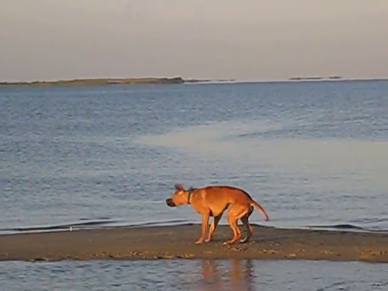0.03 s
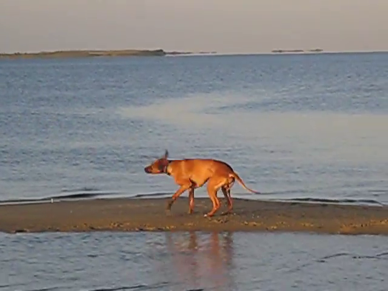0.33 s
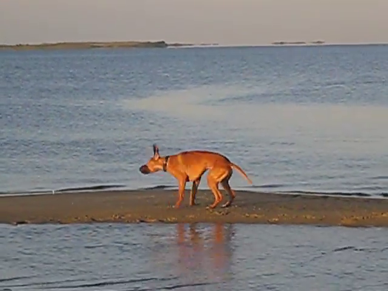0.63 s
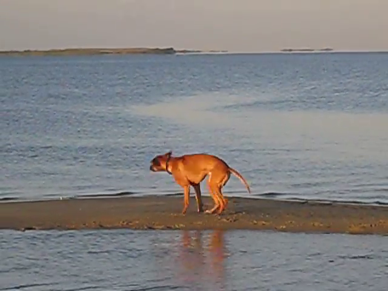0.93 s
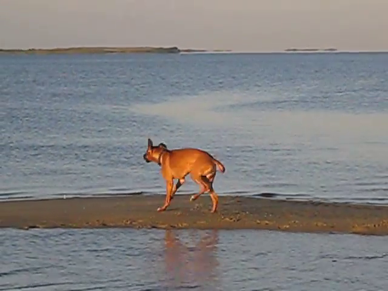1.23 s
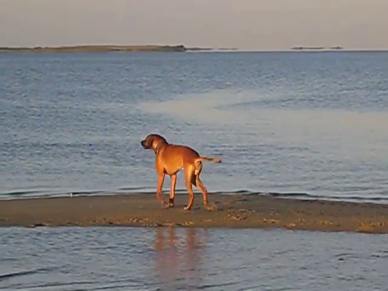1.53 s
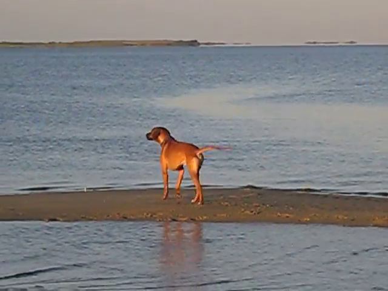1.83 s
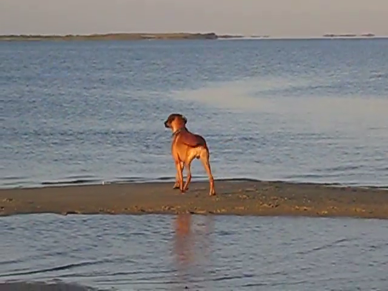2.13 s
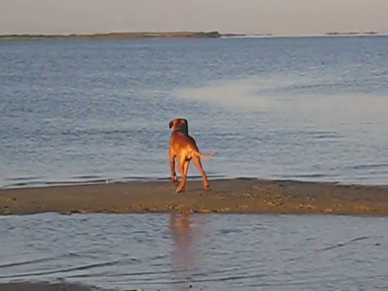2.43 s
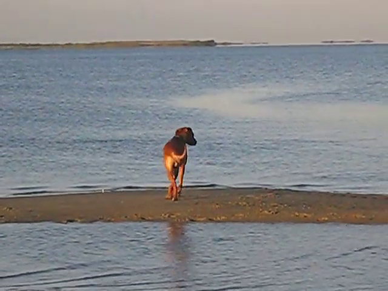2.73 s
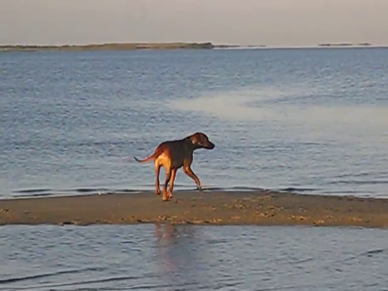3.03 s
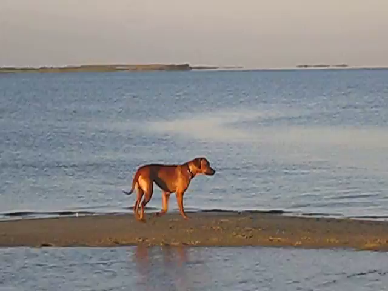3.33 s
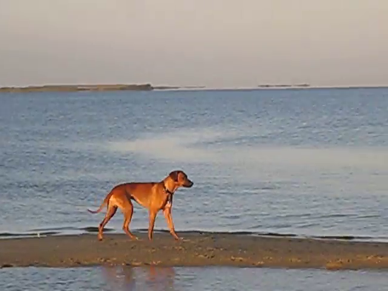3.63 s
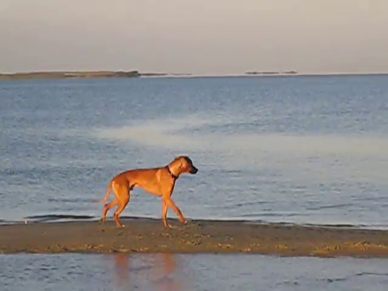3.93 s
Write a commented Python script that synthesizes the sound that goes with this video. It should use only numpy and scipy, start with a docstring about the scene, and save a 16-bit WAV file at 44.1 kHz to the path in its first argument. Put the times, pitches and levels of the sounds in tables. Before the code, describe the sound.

Outdoors by the water, a dog gives a quick shake with flapping ears and rattling collar tags. The jingling dies away, leaving soft steps in wet sand, fizzing ripples, light wind and a low distant hum.

```python
"""You hear a wet dog shake itself on a sandbar: ears slap, the collar clacks and metal tags jingle.
Then it walks on over wet sand, with an odd faint clink. Wind, lapping ripples and a low distant hum
fill the bay. Knocks, tags and bubbles ring with fading tones; the ears are short soft bursts;
spray, sand and fizz are crowds of tiny clicks; the wind is noise that slowly swells."""
import sys
import numpy as np
from scipy import signal
from scipy.fft import rfft, irfft
from scipy.io import wavfile

SR = 44100
rng = np.random.default_rng(int(sys.argv[2]) if len(sys.argv) > 2 else 0)


def to_wav(s):
    """Save 16-bit WAV."""
    ch = np.atleast_2d(s).T  # columns
    pcm = np.round(np.clip(ch, -1, 1) * 32767)  # PCM
    wavfile.write(sys.argv[1], SR, pcm.astype(np.int16))


N = 176400
T = np.arange(N) / SR
AGE = T[:SR // 5]  # seconds since a short sound began

# The low, middle and top tones of the metal tags.
# Each row: pitch in Hz, level in dB, seconds to fade by 60 dB.
TAG_LOW_TONES = [(5810, -20, 0.02), (6820, -3.5, 0.286), (7440, -3, 0.039), (7865, 3.5, 0.035)]
TAG_MID_TONES = [(8620, -14.5, 0.076), (10550, 13, 0.03), (10340, -3.5, 0.0163)]
TAG_TOP_TONES = [(11960, -5, 0.139), (12103, 0.5, 0.0226), (12400, -25, .04), (14300, -12.5, 0.065)]


def collar():
    """Buckle and tags knock together: a hollow body tone, a short clack and a bright tick."""
    # Each row: start in seconds, then the relative levels of body, clack and tick in dB.
    knocks = [(0.0166, -67.5, -54.5, -20), (0.0325, -55, -57, -24), (0.042, -59, -38, -30),
              (0.11, -41.5, -30, -26), (0.115, -36, -35, -32.5), (0.1453, -41, -42, -29.5),
              (0.174, -50.5, -38, -43), (0.205, -51.5, -43.5, -26.5), (0.211, -54.5, -46.5, -28.5),
              (0.307, -34.5, -37.5, -25.5), (0.311, -29, -28.5, -31), (0.324, -39.5, -34, -29.5),
              (0.328, -29.5, -39, -46.5), (0.3457, -34.5, -33, -34), (0.397, -62, -65, -36),
              (0.5417, -29.5, -47.5, -27.5), (0.545, -43, -51, -31), (0.611, -66, -61.5, -37.5),
              (0.6379, -54, -51, -27.5), (0.657, -60.5, -49.5, -31.5), (0.688, -66, -43.5, -20.5),
              (0.7029, -30, -19, -15), (0.709, -24.5, -24.5, -24.5), (0.7128, -27, -28.5, -39),
              (0.715, -21.5, -29, -16), (0.719, -36, -38, -48), (0.7306, -30, -41, -27),
              (0.7434, -33, -36, -28), (0.822, -58, -37.5, -26), (0.833, -51, -47.5, -28),
              (0.839, -54, -51, -39.5), (0.84, -52, -35.5, -23), (0.889, -57.5, -57, -30),
              (0.899, -23.5, -14, -19), (0.906, -36, -24.5, -25.5), (0.91, -27, -28, -25),
              (0.912, -28.5, -33, -23.5), (1.037, -47.5, -46.5, -37), (1.121, -60, -60, -30),
              (1.1283, -28, -30, -28.5), (1.134, -45, -40, -31), (1.146, -34.5, -51.5, -29),
              (1.314, -66.5, -44, -61), (1.725, -47, -64, -61.5)]
    # What a knock rings with. Each row: pitch in Hz, level in dB, seconds to fade by 60 dB.
    body_tones = [(1800, 1, 0.00765), (2002.6, 1, 0.0245), (2164.7, -7, 0.057), (2279, 10.5, 0.0136),
                  (2586.4, 2, 0.0341), (2943, 10, 0.009)]
    clack_tones = [(3412, -1, 0.0093), (3496, -9.5, 0.01045), (3980, -3.5, 0.0087), (4178, 13.5, 0.00719),
                   (4650, 1, 0.0078), (4800, -8, 0.0157), (6084, -4, 0.021), (6120, -26, 0.076)]
    # The tick's tone colour. Each row: frequency in Hz, level in dB.
    tick_colour = [(1500, -47.5), (4500, 3), (6300, 2.5), (9000, 3), (11000, 1.5), (13200, -5.5),
                   (14600, -2.5), (16000, -5)]
    onset = 1 - np.exp(-(AGE / 0.000428) ** 2)
    tick_fade = fade(0.0033) + amp(-4) * fade(0.0245)  # a snap and a softer tail
    out = np.zeros(N)
    for start, body_db, clack_db, tick_db in knocks:
        body = onset * ring(body_tones, vary_db=2.06, detune=0.0448)
        clack = onset * ring(clack_tones, vary_db=29.5, detune=0.0277)
        tick = colour(rng.standard_normal(len(AGE)) * tick_fade * onset, tick_colour)
        for part, db in (body, body_db), (clack, clack_db), (tick, tick_db - 5.5):
            add(out, start, amp(db) * unit(part, size=150))
    return out


def tags():
    """Thin metal tags chatter as they touch, ring freely for a moment, then settle against the fur."""
    # Each row: start in seconds, levels of the low, middle and top tones in dB, seconds of free ringing.
    jingles = [(.005,-32.5,-38.5,-34.5,0.014), (0.016,-29.5,-43,-41,0.0026), (.026,-40.5,-40,-24.5,0.0147),
               (0.116,-35.5,-46,-39.5,0.0057), (.176,-56,-57.5,-41,0.0064), (.207,-58,-52,-42.5,0.011),
               (.246,-57,-56.5,-47.5,0.022), (0.312,-44,-46.5,-37.5,.02), (0.336,-46.5,-57.5,-30,0.0086),
               (0.491,-43.5,-53,-32.5,0.0227), (0.613,-59.5,-41,-40.5,.008), (.637,-28,-43.5,-32,0.0053),
               (.651,-31.5,-48,-35.5,0.0055), (0.688,-45.5,-35,-28.5,0.00276),
               (0.706,-46.5,-25,-40.5,0.0062), (0.721,-40,-60,-57.5,0.017), (.79,-61,-62.5,-43,0.0146),
               (.823,-35,-53,-36,0.0074), (0.834,-38.5,-52,-26,0.0064), (.912,-48,-42,-27.5,0.0143),
               (0.984,-47.5,-43,-56,.021), (1.005,-50.5,-58.5,-35,0.002), (1.09,-57.5,-62,-46.5,0.0206),
               (1.106,-57,-59,-37.5,0.013), (1.129,-36.5,-54,-39,0.0233), (1.183,-60,-65.5,-33,0.0164),
               (1.341,-53.5,-57.5,-47.5,0.025), (1.9,-69.5,-68.5,-59.5,.02),
               (3.594,-66.5,-75.5,-59.5,0.024), (3.906,-70.5,-61,-62,0.0118)]
    fur_damping_db = -16
    onset = 1 - np.exp(-AGE / 0.00104)
    out = np.zeros(N)
    for start, *levels, free_s in jingles:
        damping = amp(fur_damping_db * np.clip((AGE - free_s) / 0.0085, 0, 1))
        touches = 0.304 * clicks(790, 1.73)[:len(AGE)] * np.exp(-AGE / 0.007)
        touches[0] += 1  # the main hit
        for tones, db in zip((TAG_LOW_TONES, TAG_MID_TONES, TAG_TOP_TONES), levels):
            one_ring = onset * ring(tones, vary_db=5.3, detune=0.01646)
            jingle = signal.fftconvolve(touches, one_ring)[:len(AGE)]
            jingle *= 1 + 0.372 * drift(1060)[:len(AGE)]  # scraping edges roughen the ring
            add(out, start, amp(db) * unit(damping * jingle, size=370))
    return out


def ears():
    """Each ear brushes in with a spatter of wet hair and lands on the head with a soft clap."""
    # Each row: start in seconds, slap level in dB, relative spatter level in dB, pitch in Hz.
    flaps = [(0.081,-36.5,-42.5,846), (.184,-41.5,-62.5,938), (.2799,-34,-38,736), (0.38,-42,-48.5,720.8),
             (0.4706,-47,-34,1287), (.542,-41,-33.5,1360), (0.5681,-34.5,-36.5,920), (0.669,-41,-40,930),
             (.764,-34.5,-39.5,954), (.864,-34.5,-41,893), (.953,-43,-52.5,845), (.96,-39.5,-49.5,854)]
    # Tone colours of a slap at base_pitch_hz and of the spatter. Each row: frequency in Hz, level in dB.
    slap_colour = [(150,-15.5), (480,-13.5), (750,3), (1050,1), (1500,-11), (2500,-29), (6000,-14.5),
                   (16000,-67)]
    spatter_colour = [(500, -14), (1500, -2), (3000, 2), (4300, 2), (6500, -14.5), (10000, -13.5),
                      (16000, -18)]
    base_pitch_hz, spatter_lead_s = 873.2, 0.0045
    out = np.zeros(N)
    for start, slap_db, spatter_db, pitch_hz in flaps:
        push = 0.2 * rng.standard_normal(len(AGE)) * fade(0.01505)
        push[0] += 1
        slap = colour(push, [(hz * pitch_hz / base_pitch_hz, db) for hz, db in slap_colour])
        add(out, start, amp(slap_db) * unit(slap, size=240))
        drops = clicks(3600, 5.65)[:len(AGE)] * AGE * np.exp(-AGE / 0.00439)
        spatter = unit(colour(drops, spatter_colour), size=550)
        add(out, start - spatter_lead_s, amp(spatter_db - 0.5) * spatter)
        crack = rng.standard_normal(len(AGE)) * np.exp(-AGE / 0.00152)
        add(out, start, amp(spatter_db - 4) * unit(colour(crack, spatter_colour), size=550))
    return out


def rattle():
    """Small collar parts rattle, each with its own short ring, and the tags shiver along."""
    # How hard the dog shakes. Each row: time in seconds, level in dB.
    shake_levels = [(0, -41.5), (.13, -52.5), (.24, -56), (.33, -48.5), (.44, -54.5), (.53, -46),
                    (.59, -52), (.67, -40), (.77, -54), (.83, -42.5), (.97, -55.5), (1.025, -39.5),
                    (1.06, -53), (1.14, -46.5), (1.22, -53), (1.35, -66.5), (1.45, -63.5), (2.2, -90.5)]
    # The rattle's tone colour. Each row: frequency in Hz, level in dB.
    rattle_colour = [(800, -33), (2000, -5), (4200, 0), (5600, -5.5), (8000, -6), (10500, -3.5),
                     (13300, -14.5), (14600, -3), (16000, -41.5)]
    vigour = curve(shake_levels) * amp(2.24 * drift(52.4))
    links = np.zeros(N)
    for _ in range(8):
        hits = clicks(260, 2.82)
        link_ring = rng.standard_normal(len(AGE)) * fade(0.013)
        links += signal.fftconvolve(hits, link_ring)[:N]
    out = unit(colour(links, rattle_colour)) * vigour
    tag_rings = ring(TAG_LOW_TONES, 0.92), ring(TAG_MID_TONES, 0.92), ring(TAG_TOP_TONES, 1)
    for tone, db in zip(tag_rings, (-12, -14, -11)):
        hits = unit(clicks(99, 6.4)) * vigour
        out += amp(db) * signal.fftconvolve(hits, tone / np.linalg.norm(tone))[:N]
    return out


def coat():
    """Loose skin and fur rustle during the shake."""
    # The rustle's strength. Each row: time in seconds, level in dB.
    rustle_levels = [(0, -57), (.13, -46), (.22, -52.5), (.45, -68), (.9, -56), (1.3, -69)]
    # Its tone colour. Each row: frequency in Hz, level in dB.
    rustle_colour = [(300, -15.5), (900, -8.5), (1600, -4.5), (2200, -8), (3500, -6), (9000, -32.5)]
    return unit(colour(clicks(5000, 3.7), rustle_colour)) * curve(rustle_levels)


def swish():
    """A faint hollow swish rises and falls under the first ear flaps."""
    # Each row: time in seconds, pitch in Hz, level in dB.
    swish_path = [(.1, 1250, -64), (.18, 1440, -50.5), (.24, 1945, -48.5), (.35, 1535, -50.5),
                  (0.499, 1200, -58)]
    times, hz, db = np.transpose(swish_path)
    hiss = band_noise(np.interp(T, times, hz), width_hz=665)
    return hiss * amp(np.interp(T, times, db)) * (T < times[-1])


def paws():
    """Paws squelch softly in wet sand."""
    # Each row: middle of the step in seconds, level in dB.
    steps = [(1.262, -50.5), (1.35, -53), (1.5, -54.5), (1.755, -53), (1.85, -54.5), (1.92, -52.5),
             (2.0, -56.5), (2.36, -59.5), (2.5, -60.5), (2.66, -61), (2.79, -56.5), (2.95, -60.5),
             (3.77, -54.5), (3.86, -56)]
    # The sand's tone colour. Each row: frequency in Hz, level in dB.
    sand_colour = [(300,-0.5), (1500,-9), (2900,5.5), (5500,-0.5), (8000,-8.5), (12000,-7.5), (16000,-20)]
    pressure = sum(amp(db) * swell(middle, width_s=0.0364) for middle, db in steps)
    return unit(colour(clicks(2500, 2.66), sand_colour)) * pressure


def water():
    """Ripples fizz on the sand with many tiny bubbles; one little wave sizzles; a few plips stand out."""
    # The strength of the ripples. Each row: time in seconds, level in dB.
    ripple_levels = [(0,-63.5), (1.3,-56), (1.6,-54.5), (1.7,-59.5), (1.9,-60.5), (2.06,-61), (2.17,-60),
                     (2.4,-59.5), (2.7,-61.5), (2.9,-64.5), (3.15,-59.5), (3.25,-61), (3.37,-55.5),
                     (3.47,-60.5), (3.57,-62), (3.73,-60.5), (4,-64)]
    # The tone colour of their fizz. Each row: frequency in Hz, level in dB.
    fizz_colour = [(500,-23), (1800,-13), (3100,-1), (3600,-0.5), (4300,-1.5), (5000,-3.5), (6000,-8),
                   (10000,-14), (16000,-32)]
    # Plips in the shallows. Each row: start in seconds, starting pitch in Hz, relative level in dB.
    plips = [(1.55, 3764, -42.5), (1.658, 4200, -51), (2.161, 4243, -52.5), (2.951, 4198, -51),
             (2.964, 3272, -55), (3.149, 4145, -47.5), (3.706, 4180, -50), (3.861, 3886, -42),
             (3.875, 4450, -64.5), (3.976, 3650, -53.5)]
    fizz = unit(colour(clicks(6000, 3.23), fizz_colour))
    froth = unit(sum(signal.fftconvolve(clicks(22, 2.4), bubble(hz, fade_s=0.016))[:N]
                     for hz in np.geomspace(1600, 4600, num=24)))
    lapping = curve(ripple_levels) * amp(1.67 * drift(25.7))
    out = lapping * (amp(-0.5) * fizz + amp(-3.5) * froth)
    foam = band_noise(4390, width_hz=890)
    out += amp(-57.5) * foam * swell(3.366, width_s=0.153)  # the little wave
    for start, hz, db in plips:
        splash = 0.8 + 0.997 * drift(433)[:len(AGE)]
        add(out, start, amp(db) * bubble(hz, fade_s=0.109) * splash)
    return out


def bubble(hz, fade_s):
    """A small bubble rings and rises in pitch."""
    onset = 1 - np.exp(-AGE / 0.002)
    return onset * fade(fade_s) * np.sin(2 * np.pi * hz * AGE * (1 + 0.88 * AGE))


def wind():
    """Wind and far water make a steady rush, and a low gust swells over it."""
    # Tone colours of the rush and the gust. Each row: frequency in Hz, level in dB.
    rush_colour = [(15,-33.5), (25,-8.5), (43,-13.5), (53,-8), (76,-8.5), (97,-5), (149,-12.5), (270,-9.5),
                   (451,-11.5), (887,-12.5), (1440,-20.5), (4250,-32), (7310,-33.5), (12200,-35.5),
                   (16000,-43.5)]
    gust_colour = [(80, -17.5), (180, -12), (240, 1), (400, -12.5), (800, -10.5), (1500, -12.5),
                   (4000, -38.5)]
    # The gust's strength. Each row: time in seconds, level in dB.
    gust_levels = [(0, -62.5), (1.1, -62), (2, -71), (2.8, -58.5), (3.3, -55.5), (3.85, -54.5), (4, -56.5)]
    rush = amp(-52.5 + 0.5 * drift(10.1)) * unit(colour(rng.standard_normal(N), rush_colour))
    gust = curve(gust_levels) * unit(colour(rng.standard_normal(N), gust_colour))
    return rush + gust


def distant_hum():
    """A low hum with an uneven throb just below it, like a distant boat."""
    hum_hz, throb_hz = 72.85, 66
    hum = np.sin(2 * np.pi * hum_hz * T + 0.13 * drift(1))
    hum *= 1 + 0.075 * drift(3.75)
    phase = 2 * np.pi * throb_hz * T
    throb = drift(11.2) * np.sin(phase) + drift(6.4) * np.cos(phase)
    return amp(-55.5) * unit(hum) + amp(-62) * unit(throb)


def amp(db):
    """Turns decibels into a number to multiply by."""
    return 10 ** (np.asarray(db) / 20)


def unit(x, size=None):
    """Scales a sound to an average strength (rms) of 1, over its first `size` samples if given."""
    return x / np.sqrt(np.mean(x[:size] ** 2) + 1e-20)


def curve(points):
    """A changing volume that joins points of (seconds, dB)."""
    return amp(np.interp(T, *np.transpose(points)))


def fade(seconds):
    """Dies away by 60 dB in the given time."""
    return np.exp(-np.log(1000) * AGE / seconds)


def swell(middle_s, width_s):
    """One smooth rise and fall."""
    return np.exp(-((T - middle_s) / width_s) ** 2)


def add(mix, start_s, sound):
    """Mixes a sound in at the given time."""
    part = mix[max(round(start_s * SR), 0):][:len(sound)]
    part += sound[:len(part)]


def colour(x, points):
    """Makes some frequencies louder and others softer, following points of (Hz, dB)."""
    hz, db = np.transpose(points)
    log_hz = np.log(abs(np.fft.fftfreq(4096, 1 / SR)) + 1)
    log_gain = np.log(amp(np.interp(log_hz, np.log(hz + 1), db)))
    response = np.exp(np.conj(signal.hilbert(log_gain)))  # rings only after a hit, never before
    taps = np.fft.ifft(response).real
    return signal.fftconvolve(x, taps[:len(taps) // 2])[:len(x)]


def drift(rate_hz):
    """A smooth random wobble; a higher rate makes it faster."""
    hz = np.fft.rfftfreq(N, 1 / SR)
    return unit(irfft(rfft(rng.standard_normal(N)) * np.exp(-(hz / rate_hz) ** 2), N))


def clicks(per_s, spread_db):
    """Random clicks of uneven size."""
    size = amp(spread_db * np.minimum(rng.exponential(1, N), 4))
    return size * rng.choice([-1, 1], N) * (rng.random(N) < per_s / SR)


def ring(tones, vary_db, detune=0):
    """The fading tones of a struck object; each blow favours different ones."""
    out = 0
    for hz, db, fade_s in tones:
        louder, higher, phase = rng.uniform(-0.845, 1, 3)
        wave = np.sin(2 * np.pi * hz * (1 + detune * higher) * AGE + np.pi * phase)
        out = out + amp(db + vary_db * louder) * fade(fade_s) * wave
    return out


def band_noise(hz, width_hz):
    """A hiss gathered around one pitch, steady or moving."""
    phase = 2 * np.pi * np.cumsum(hz * np.ones(N)) / SR
    return drift(width_hz) * np.sin(phase) + drift(width_hz) * np.cos(phase)


def scene():
    """The dog in the open air by the water, in one channel."""
    dog = collar() + tags() + ears() + rattle() + coat() + swish() + paws()
    return (dog + water() + wind() + distant_hum())[None]


def record(dry):
    """Cuts away the very highest treble, above 15900 Hz."""
    low_pass = signal.firwin(255, 15900, window=("kaiser", 8), fs=SR)
    return signal.oaconvolve(dry, low_pass[None], "same")


dry = scene()
out = record(dry)
to_wav(out)
```